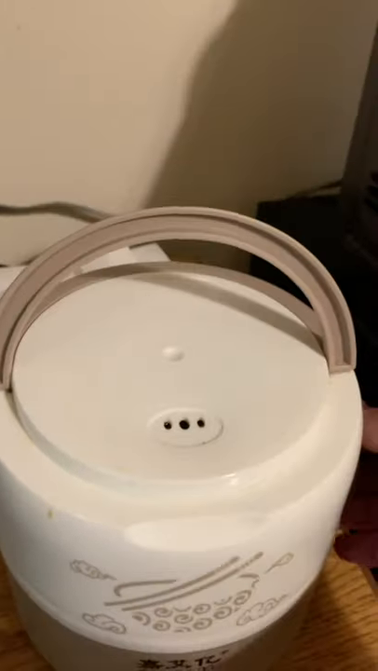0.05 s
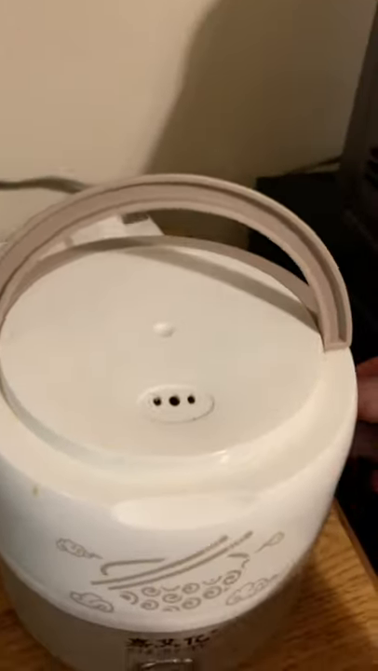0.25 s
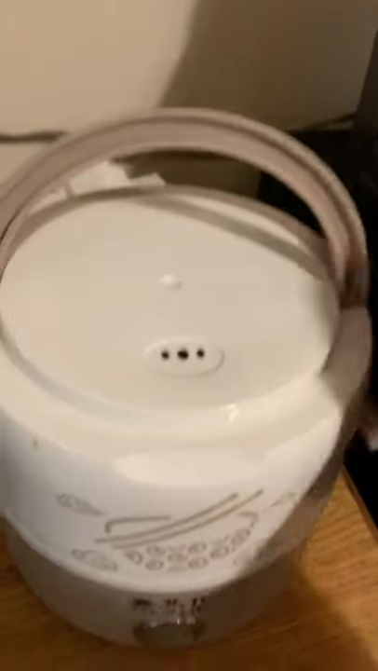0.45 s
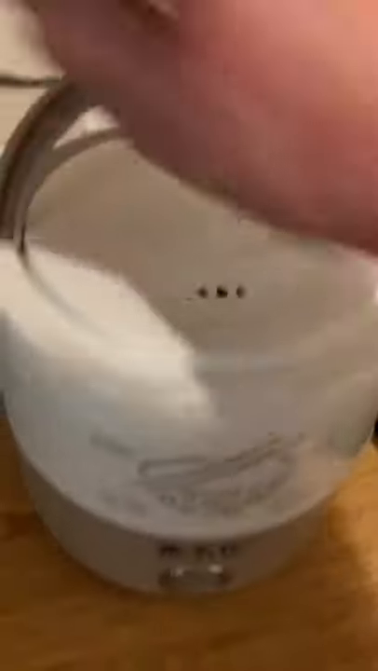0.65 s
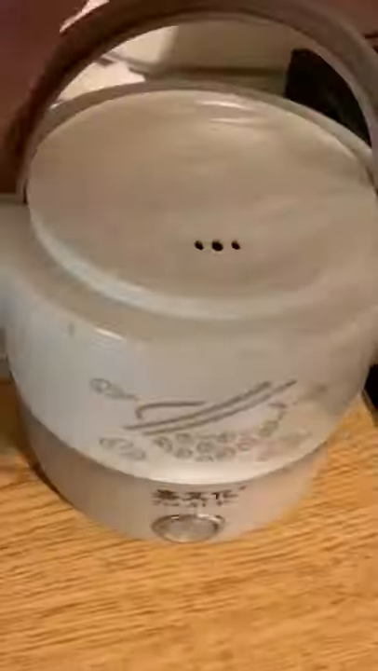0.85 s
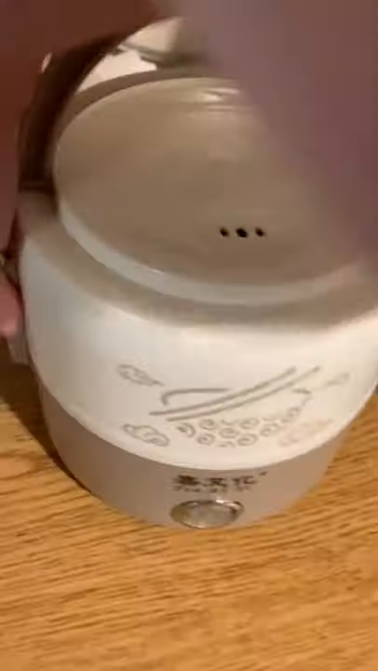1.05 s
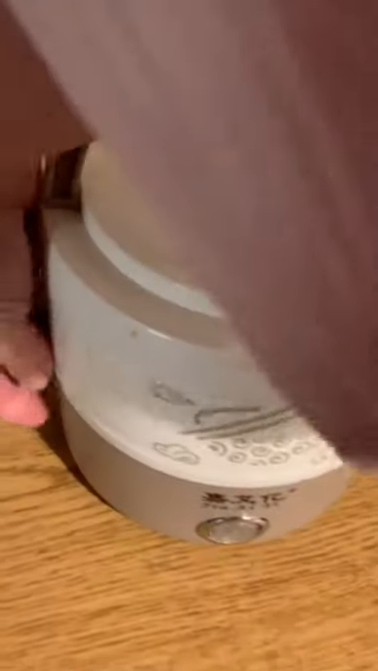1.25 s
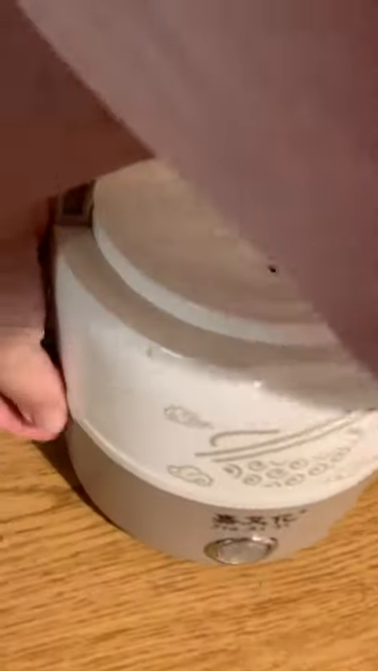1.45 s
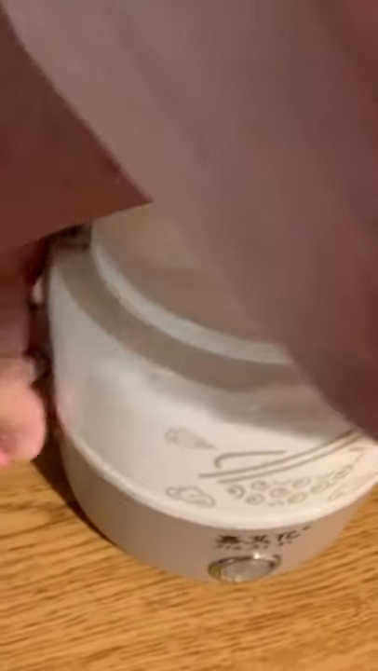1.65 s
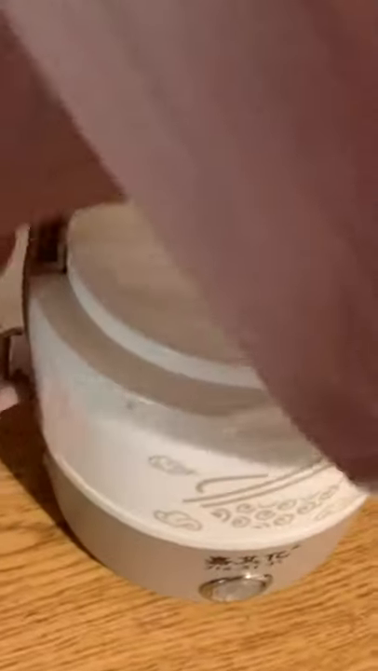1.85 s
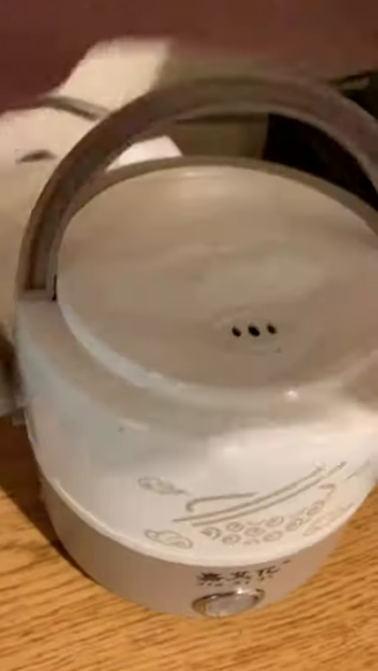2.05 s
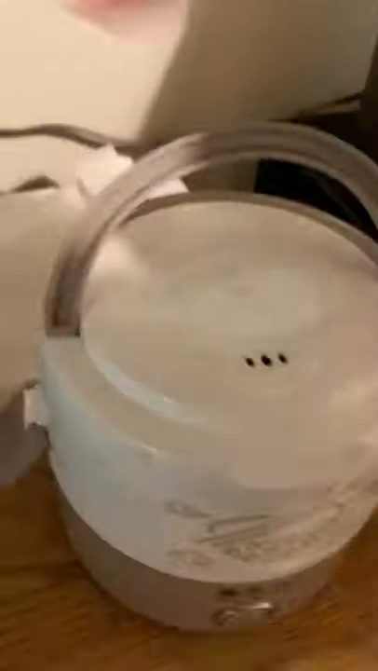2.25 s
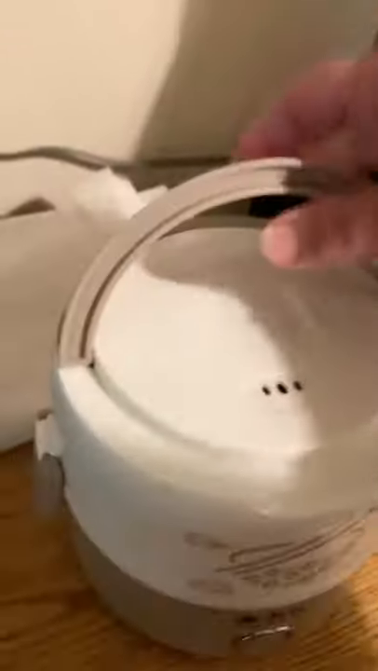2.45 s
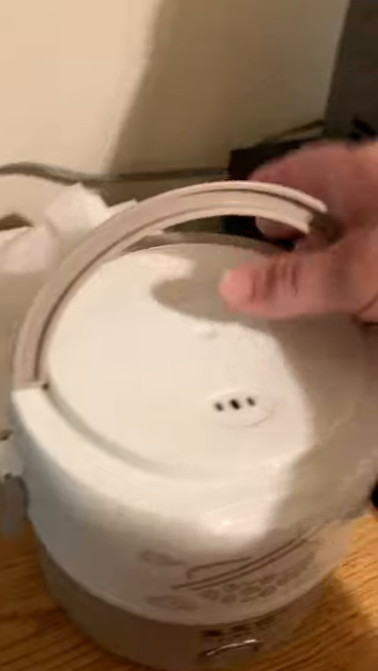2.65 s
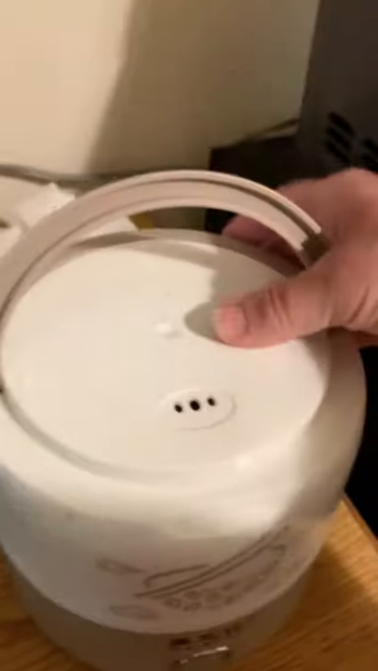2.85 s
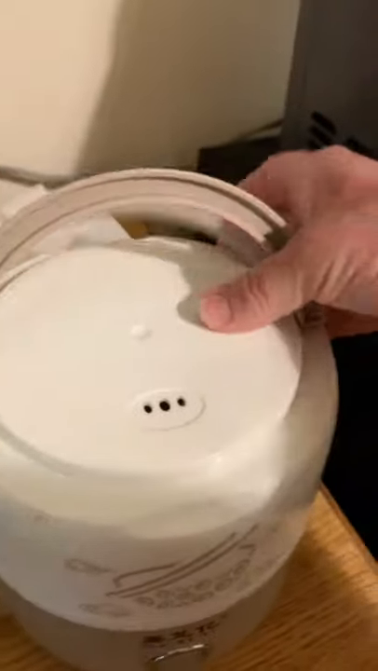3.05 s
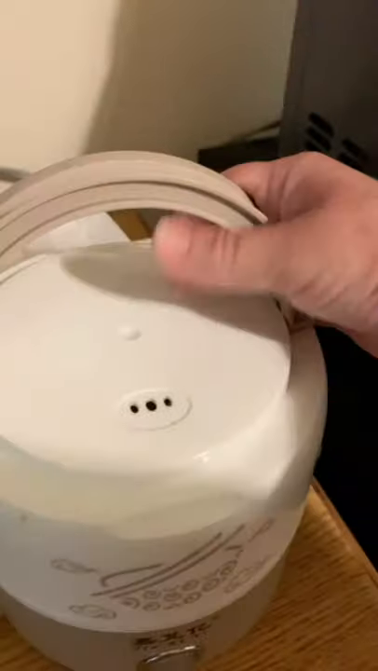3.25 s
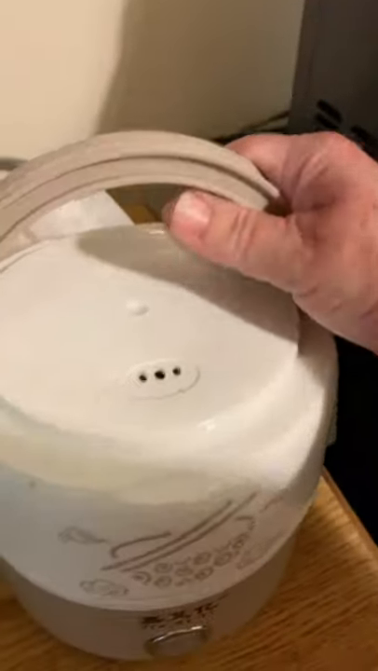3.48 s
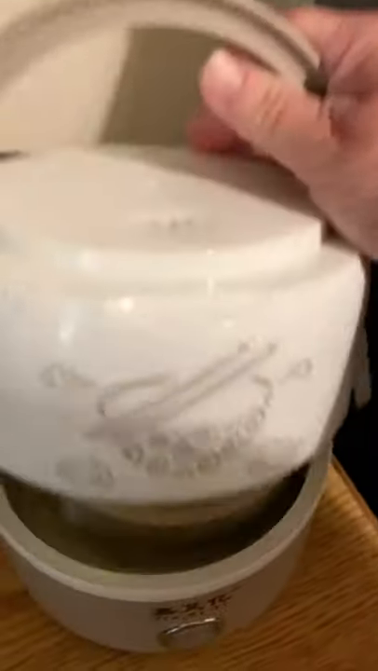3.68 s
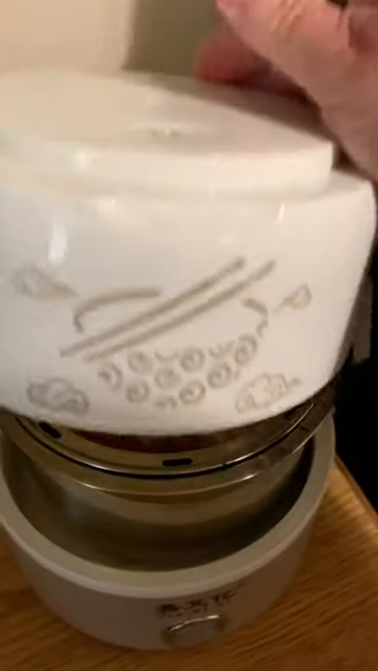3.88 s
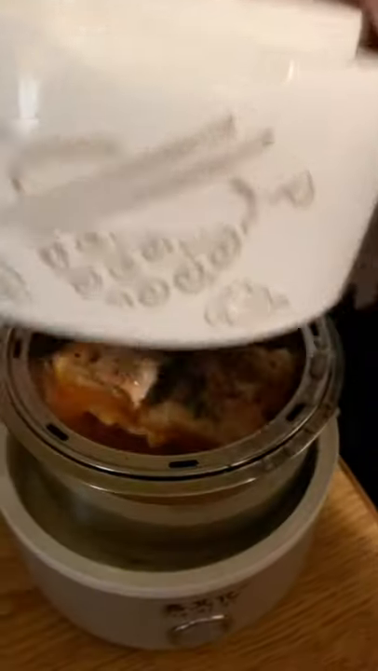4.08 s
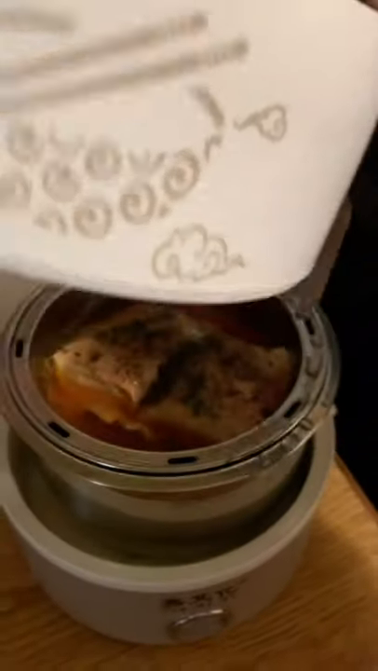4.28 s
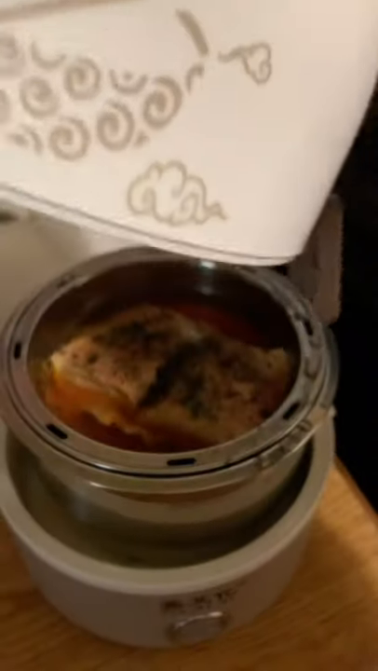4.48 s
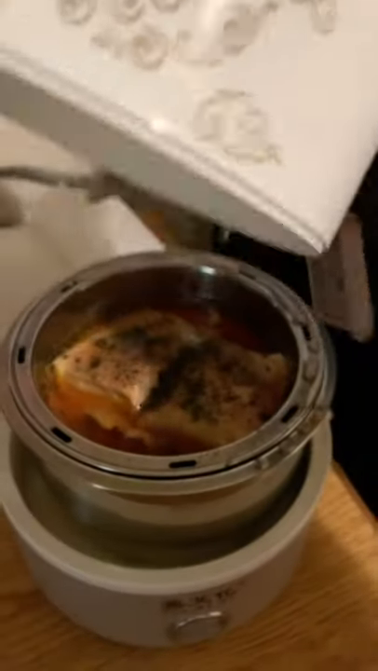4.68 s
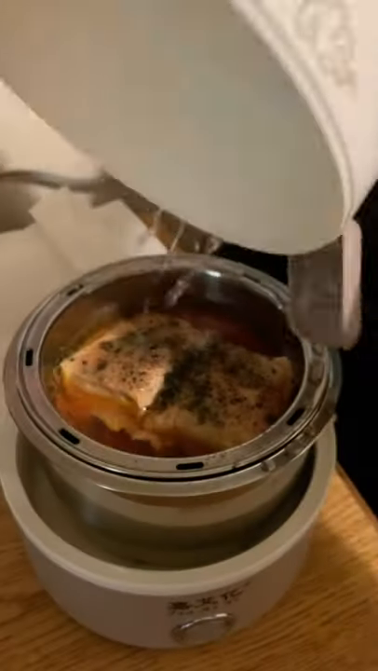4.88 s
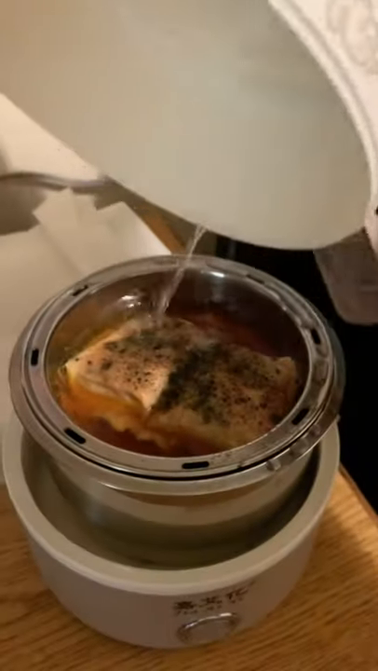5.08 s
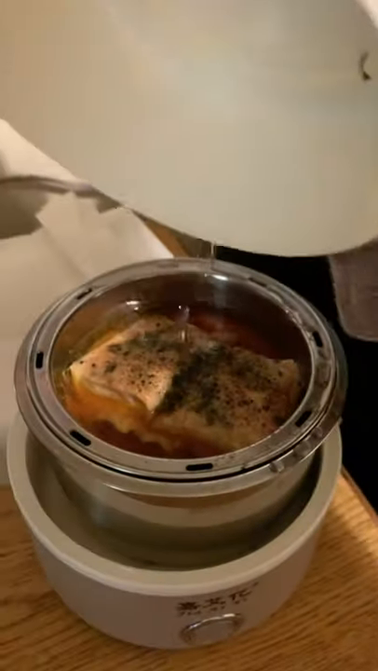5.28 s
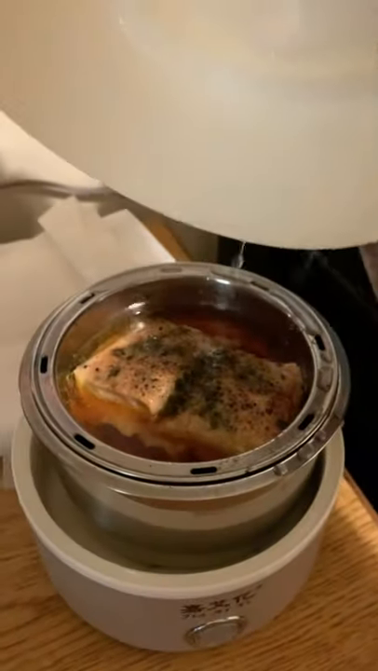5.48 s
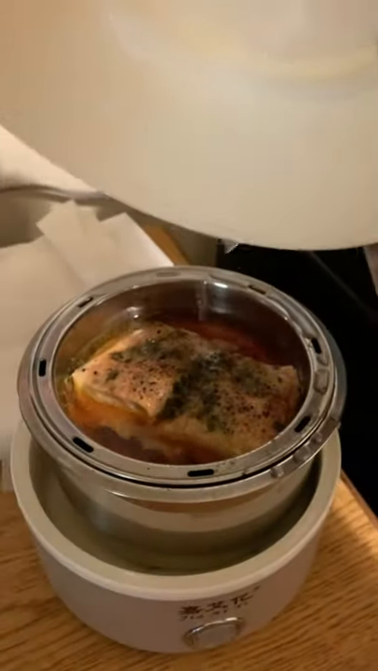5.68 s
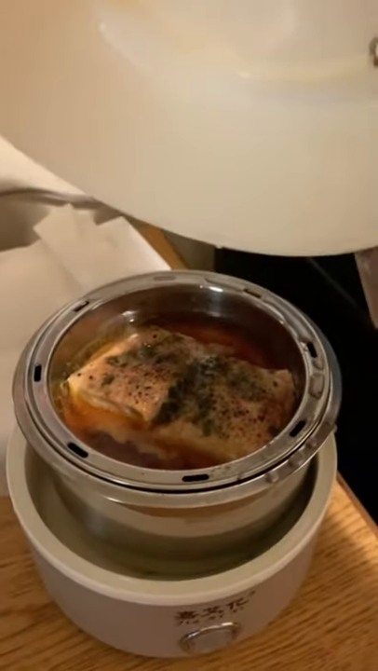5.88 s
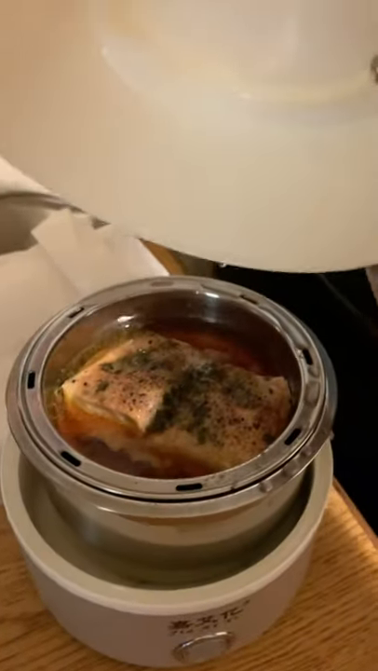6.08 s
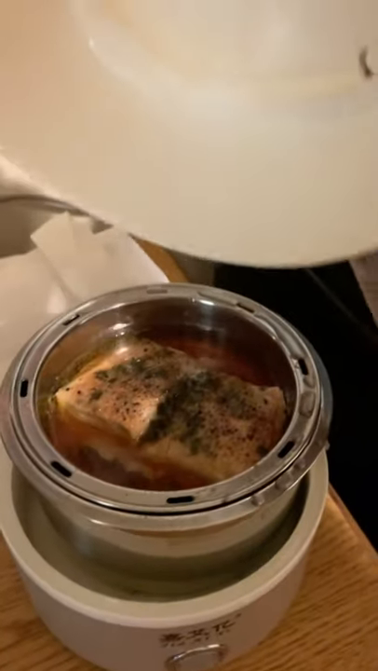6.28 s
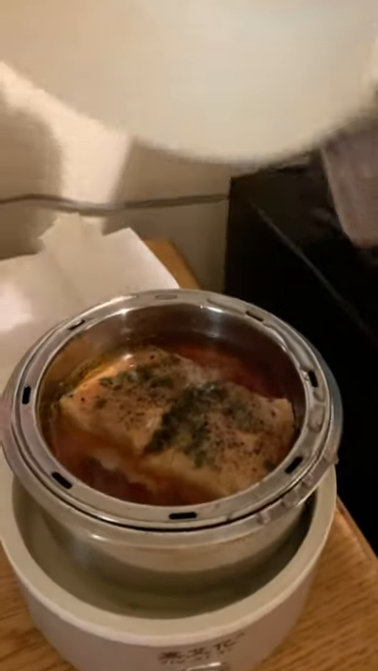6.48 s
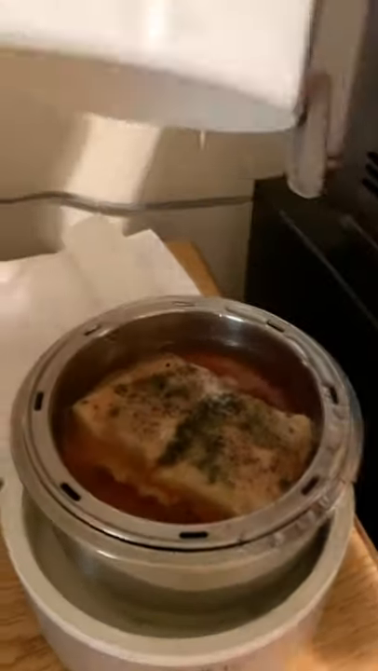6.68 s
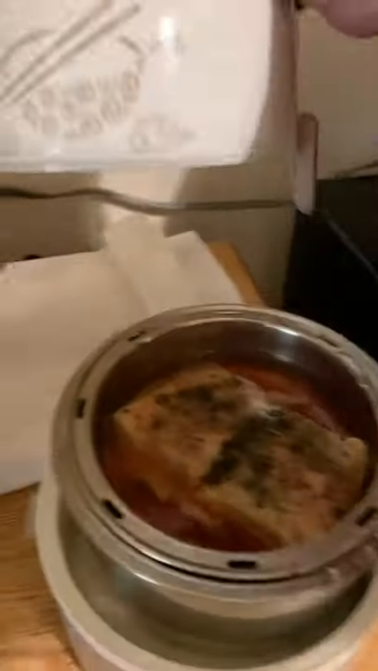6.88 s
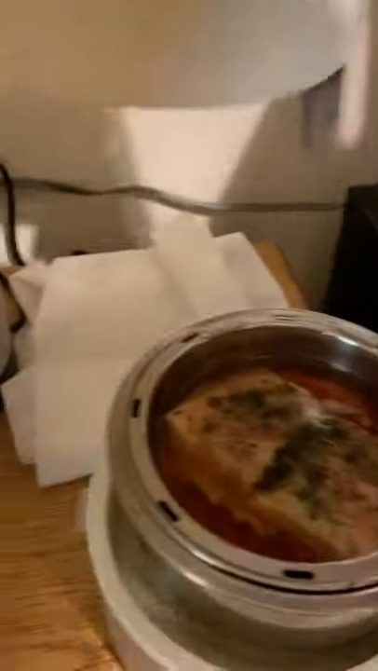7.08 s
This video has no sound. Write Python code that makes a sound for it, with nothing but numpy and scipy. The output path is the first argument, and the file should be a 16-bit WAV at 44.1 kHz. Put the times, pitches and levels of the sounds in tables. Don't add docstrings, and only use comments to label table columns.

```python
import sys
import numpy as np
from scipy import signal
from scipy.fft import rfft, irfft, next_fast_len
from scipy.io import wavfile
from scipy.ndimage import uniform_filter1d

SR = 44100
rng = np.random.default_rng(int(sys.argv[2]) if len(sys.argv) > 2 else 0)


def wrap_up_sound(samples):
    columns = np.atleast_2d(samples).T
    tamed = np.clip(columns, -1, 1)
    steps = np.round(tamed * 32767).astype(np.int16)
    wavfile.write(sys.argv[1], SR, steps)


def convert_level_to_amplitude(level_db):
    exponent = np.asarray(level_db, float) / 20
    return 10 ** exponent


N = 314433


def evened(x):
    return x / np.sqrt(np.mean(x ** 2) + 1e-20)


def peaked(x):
    return x / (abs(x).max() + 1e-20)


def read(points, hz):
    f, value = np.transpose(points)
    return np.interp(np.log(hz + 1), np.log(f + 1), value)


def humps(table):
    return lambda hz: sum(convert_level_to_amplitude(db) / (1 + ((hz - f) / w * 2) ** 2) for f, w, db in table)


def level(rows):
    s, db = np.transpose(rows)
    return convert_level_to_amplitude(np.interp(np.arange(N) / SR, s, db, left=-120, right=-120))


def strokes(rows, rise_db_per_s, fall_db_per_s, rest_db):
    t = np.arange(N) / SR
    s, hold, db = np.transpose(rows)[:, :, None]
    db = db - rise_db_per_s * np.maximum(s - t, 0)
    db = db - fall_db_per_s * np.maximum(t - s - hold, 0)
    return convert_level_to_amplitude(np.maximum(db.max(0), rest_db))


def add(mix, s, sound):
    part = mix[max(round(s * SR), 0):][:len(sound)]
    part += sound[:len(part)]


def ring(modes, t, weight_db=0, detune=1):
    hz, db, t60 = np.transpose(modes)[:, :, None]
    fade = convert_level_to_amplitude(db + weight_db - 60 * t / t60)
    return (fade * np.sin(2 * np.pi * hz * detune * t)).sum(0)


# pitch_hz, likeness (1 = same)
PORT_LIKENESS = [(60, 0.98), (400, 0.82), (1000, 0.36), (2400, 0.4), (4000, 1), (5000, 0.82), (9000, 0.78)]


def two_ports(a, b, c, d, hz):
    same = np.clip(read(PORT_LIKENESS, hz), -1, 1)[:, None]
    left = a + 1j * b
    return np.array([left, same * left + np.sqrt(1 - same ** 2) * (c + 1j * d)])


def diffuse(gain, patchy_db, flicker_db):
    frames, hz = N // 256 + 5, np.fft.rfftfreq(512, 1 / SR)
    a, b, c, d, patches = rng.standard_normal((frames, 257, 5)).T
    patches = evened(uniform_filter1d(uniform_filter1d(patches, size=6, axis=0), size=8, axis=1))
    flicker = evened(uniform_filter1d(rng.standard_normal(frames), size=2))
    z = two_ports(a, b, c, d, hz)
    z *= gain(hz)[:, None] * convert_level_to_amplitude(patchy_db * patches + flicker_db * flicker)
    return evened(signal.istft(z, nperseg=512, noverlap=256)[1][:, :N])


# pitch_hz, level_db_per_hz
HOUSE_HUM = [(15, -23), (27, -5.5), (76, -1), (134, -5), (230, -5.5), (450, -15), (1400, -26.5),
             (1950, -100)]
# pitch_hz, width_hz, level_db
SWAY_COLOUR = [(65, 10, 0)]
# start_s, hold_s, level_db
SWAYS = [
    (1.59, 0.0083, -37),
    (2.8, 0.027, -45.5),
    (3.6, 0.29, -54.5),
    (4.32, 0.25, -49.5),
]


def hum():
    frames, hz = N // 512 + 5, np.fft.rfftfreq(2048, 1 / SR)
    a, b, c, d, e, g = rng.standard_normal((frames, 1025, 6)).T
    house = two_ports(a, b, c, d, hz) * convert_level_to_amplitude(read(HOUSE_HUM, hz))[:, None]
    sway = (e + 1j * g) * humps(SWAY_COLOUR)(hz)[:, None] ** 2
    house, sway = (evened(signal.istft(z, nperseg=2048, noverlap=1536)[1][..., :N]) for z in (house, sway))
    motion = strokes(SWAYS, rise_db_per_s=181, fall_db_per_s=222, rest_db=-62.5)
    return convert_level_to_amplitude(-49) * house + motion * sway


# pitch_hz, t60_s, level_db
ROOM = [(99, 0.22, 7), (530, 0.52, 1.5), (1200, 0.22, 4.5), (3450, 0.31, 0), (16000, 0.12, 4)]


def room(x):
    length, out = SR // 5, np.zeros((2, N))
    hz, t = signal.stft(np.zeros(length), SR, nperseg=256)[:2]
    t60, lift_db = (read(np.array(ROOM)[:, [0, k]], hz)[:, None] for k in (1, 2))
    fade = convert_level_to_amplitude(lift_db - 60 * t / t60)
    turn = np.arange(N) / SR * 7.3 % 3
    for k in range(3):
        taps = np.zeros((3, length))
        at = np.arange(120, length - 20, 20) + rng.integers(0, 20, (3, (length - 121) // 20))
        np.put_along_axis(taps, at, rng.choice([-1., 1.], at.shape), 1)
        z = signal.stft(taps[0] + .5 * taps[1:], SR, nperseg=256)[2]
        tail = signal.istft(z * fade, SR, nperseg=256)[1]
        tail = tail / np.linalg.norm(tail[0])
        share = np.cos(np.pi / 2 * np.minimum(abs((turn - k + 1.5) % 3 - 1.5), 1))
        out += signal.oaconvolve((x * share)[None], tail, axes=1)[:, :N]
    return out


# pitch_hz, width_hz, level_db
STEAM_JETS = [(1870, 470, 6.5), (4600, 1000, -6), (6160, 2040, 0), (10900, 1200, -24.5)]


def steam():
    start_s, level_db = 3.66, -64
    swell = strokes([(start_s, 0, level_db)], rise_db_per_s=62, fall_db_per_s=2, rest_db=-120)
    return convert_level_to_amplitude(7.5) * swell * diffuse(humps(STEAM_JETS), patchy_db=3.5, flicker_db=-1.5)


# pitch_hz, level_db_per_hz
CLOTH = [(300, -29), (1200, -1.5), (2400, 4.5), (3000, -1.5), (6000, -1.5), (10000, -6), (13300, -6),
         (16100, -34)]
# start_s, hold_s, level_db
BRUSHES = [(.15, 0.0042, -67), (.31, 0.014, -73.5), (.95, 0.054, -63.5), (1.18, 0.11, -64.5),
           (1.52, 0.17, -65), (1.93, 0.0075, -71), (2.08, 0.031, -71), (2.17, 0.12, -64.5),
           (2.51, 0.0039, -69), (2.66, 0.055, -63), (2.86, 0.0065, -66), (3.05, 0.015, -70),
           (3.15, .03, -76), (3.46, 2.53, -72)]


def sleeve():
    gain = strokes(BRUSHES, rise_db_per_s=229, fall_db_per_s=183, rest_db=-77.5)
    return convert_level_to_amplitude(8.5) * gain * diffuse(lambda hz: convert_level_to_amplitude(read(CLOTH, hz)), patchy_db=-4.0, flicker_db=1.5)


# pitch_hz, level_db, t60_s
BOX_SHELL = [(790, -12, 0.025), (1150, -8.5, 0.04), (1332, -7.5, 0.016), (1700, -1.5, 0.016),
             (2050, -0.5, 0.0092), (2570, 0, 0.027), (2940, -9, 0.0075), (3130, -10, 0.0098),
             (4820, -0.5, 0.0057)]
# pitch_hz, level_db, t60_s
COVER_SHELL = [(824, 6.5, 0.1), (1120, 8.5, 0.013), (1460, -2, 0.033), (1680, 6, 0.017), (1960, 9.5, 0.012),
               (2515, 5.5, 0.011), (3180, 0, 0.014), (4060, 12, 0.0026)]
# time_s, level_db
HAND_PRESSURE = [
    (0.0, -73.5),
    (2.34, -65.5),
    (3.14, -79.5),
    (3.55, -59),
    (4.35, -67),
    (4.59, -55.5),
    (5.18, -74),
    (7.13, -61),
]


def rubbing():
    grains_per_s = 2500
    uneven = convert_level_to_amplitude(0.9 * np.minimum(rng.exponential(1, N), 4))
    slips = rng.standard_normal((2, N)) * uneven * (rng.random(N) < grains_per_s / SR)
    slips[1] = 0.38 * slips[0] + 0.14 * slips[1]
    shell = ring(BOX_SHELL + COVER_SHELL, np.arange(1500) / SR * 1.05) * convert_level_to_amplitude(-np.arange(1500) / 12.0)
    return convert_level_to_amplitude(4.5) * level(HAND_PRESSURE) * evened(signal.oaconvolve(slips, shell[None], axes=1)[:, :N])


# pitch_hz, width_hz, level_db
GLOSS = [(12000, 3500, 0)]
# start_s, hold_s, level_db
SQUEAKS = [
    (3.056, .012, -55),
    (3.135, .01, -65),
    (3.18, .006, -59),
    (4.66, 0.017, -55),
    (6.99, .02, -74),
]


def squeaks():
    gain = strokes(SQUEAKS, rise_db_per_s=1500, fall_db_per_s=800, rest_db=-120)
    return gain * diffuse(lambda hz: humps(GLOSS)(hz) ** 2, patchy_db=3.5, flicker_db=4.5)


# pitch_hz, width_hz, level_db
POT_RIM = [(350, 380, 6.5), (1200, 480, -14), (2000, 290, -8), (2630, 1300, 1.5), (4090, 230, 4),
           (4490, 240, 5), (6300, 3200, -12.5), (11600, 3600, -19)]
# time_s, level_db
SCRAPE = [
    (3.53, -69),
    (3.59, -61.5),
    (3.69, -61.5),
    (3.72, -57.5),
    (3.76, -57),
    (3.81, -59.5),
    (3.85, -82),
    (3.93, -85),
]


def scrape():
    return convert_level_to_amplitude(15.0) * level(SCRAPE) * diffuse(humps(POT_RIM), patchy_db=-0.5, flicker_db=2.5)


# start_s, level_db, pitch_hz, t60_s
DESK_BUMPS = [(0.311, -27, 157, 0.02), (0.422, -30, 198, 0.056), (0.97, -38.5, 173, 0.041),
              (1.37, -31, 176, 0.022), (1.566, -19.5, 163, 0.058), (1.655, -30.5, 132.5, 0.08),
              (1.701, -30, 290, 0.014), (2.189, -25.5, 326, 0.032), (1.577, -23.5, 108, 0.091),
              (2.189, -31, 138, 0.077), (3.081, -25, 176, 0.027), (3.089, -27.5, 190, 0.027),
              (3.254, -39, 131, 0.1), (3.326, -34, 204, 0.025), (3.387, -37.5, 181.7, 0.73),
              (3.44, -30.5, 178, 0.029)]
# start_s, level_db, pitch_hz, t60_s
HANDLE_TAPS = [
    (0.562, -29, 469, 0.081),
    (0.672, -35, 453, 0.053),
    (3.572, -27.5, 441, 0.049),
]


def bumps():
    out, t = np.zeros(N), np.arange(8000) / SR
    for s, db, hz, t60 in DESK_BUMPS + HANDLE_TAPS:
        thud = ring([(hz, 0, t60), (hz * 1.6, -8, t60 * .6)], t) * (1 - np.exp(-t / .003))
        add(out, s, convert_level_to_amplitude(db + 3.0) * peaked(thud))
    return out


# pitch_hz, level_db
CRACK = [(600, 5), (1500, 7), (2600, 11), (4000, 4), (8000, 2.5), (11500, -5), (15500, -7), (16400, -26)]
# pitch_hz, width_hz, level_db
STIFF_RIBS = [(3850, 170, -5.5), (7320, 960, -7), (11360, 880, -0.5)]


def knocks(rows, low, shell, spot_db, scatter_db, crack_t60):
    out, t = np.zeros(N), np.arange(4600) / SR
    short, hz = t[:1024], np.fft.rfftfreq(1024, 1 / SR)
    held = convert_level_to_amplitude(-60 * short / .05)
    thin = signal.butter(2, 864, "high", fs=SR)
    chance, noise = rng.standard_normal((len(rows), 24, 1)), rng.standard_normal((len(rows), 2048))
    for (s, db, low_db, crack_db, spot_hz, contact_ms), luck, hiss in zip(rows, chance, noise):
        u = short / (contact_ms / 1000)
        contact = u ** 1.41 * np.exp(-u) * hiss[:1024] * abs(hiss[:1024]) ** 1.41
        even = rfft(contact)
        even = irfft(even / np.sqrt(uniform_filter1d(abs(even) ** 2, size=9)))
        even = even * np.minimum(u * 4, 1)

        near = np.exp(-(np.log(np.array(shell)[:, :1] / spot_hz) / 0.17) ** 2)
        weight_db = spot_db * near + scatter_db * luck[:len(shell)]
        modes = held * ring(shell, short, weight_db, 1 + 0.018 * luck[12:12 + len(shell)])
        body = ring(low, t, 2.0 * luck[21:21 + len(low)])
        body = body * (1 - np.exp(-t / 0.0042))

        crack = peaked(abs(contact)) ** 0.97 + 0.73 * np.minimum(u, 1) * convert_level_to_amplitude(-60 * short / crack_t60)
        octaves = np.log2(np.maximum(hz / 7000, 1))
        bright_db = 0.66 * (db + crack_db + 21.5) * octaves
        ribs = 1 + sum(convert_level_to_amplitude(rib_db + 5.1 * k) / (1 + 2j * (hz - f) / w)
                       for (f, w, rib_db), k in zip(STIFF_RIBS, luck[17:, 0]))
        crack = irfft(rfft(crack * hiss[1024:]) * convert_level_to_amplitude(read(CRACK, hz) + bright_db) * ribs)

        sound = convert_level_to_amplitude(low_db + 2.0) * peaked(body)
        sound[:2047] += peaked(signal.lfilter(*thin, signal.fftconvolve(modes, even)))
        sound[:1024] += convert_level_to_amplitude(crack_db + 11.0) * peaked(crack)
        add(out, s - .0006 * contact_ms, convert_level_to_amplitude(db - 0.5) * sound)
    return out


def ticks(rows):
    hollow_db, contact_ms = -16.5, 1.1
    return [(s, db, hollow_db, crack_db, hz, contact_ms) for s, db, crack_db, hz in rows]


# start_s, shell_db, hollow_rel_db, crack_rel_db
ON_RIM = [(4.371, -35.5, -16, -28), (4.426, -41, -30, -22), (4.44, -26, -36, -10.5), (4.7, -34, -15, -17),
          (4.749, -23.5, -13, -10.5), (4.819, -37, -15, -8), (4.83, -29.5, -26, -27),
          (4.966, -25.5, -34, -19), (5.025, -33, -7, -31), (5.053, -32.5, -30, -34), (5.184, -36, -30, -12),
          (5.232, -21, -15, -12), (5.24, -33, -24, -17), (5.526, -30, -6.5, -28), (5.566, -22, -9.5, -5),
          (5.711, -35, -7, -38), (5.828, -42, -5, -29), (5.904, -28.5, -9, -28), (6.002, -37, -9, -31),
          (6.025, -24, -15, -17), (6.569, -37, -36, -24), (6.582, -34, -8.5, -13.5), (6.903, -31, -39, -19),
          (6.949, -35, -20, -24), (6.992, -38, -28, -1.5), (7.079, -32.5, -10.5, -30),
          (7.095, -27, -22, -22)]
# start_s, shell_db, hollow_rel_db, crack_rel_db
ON_WALL = [(4.465, -32, -31, -29), (4.65, -33.5, -21, -14), (4.738, -22, -29, -24),
           (4.883, -22, -11.5, -15), (5.074, -32, -14.5, -12.5), (5.19, -26.5, -8, -16.5),
           (5.358, -25, -11, -10.5), (5.365, -26.5, -17, -19), (5.393, -33, -27, -4.5),
           (5.412, -32, -27, -16), (5.534, -28.5, -33, -13.5), (5.556, -34, -15, -15),
           (5.649, -25.5, -30, -15), (5.657, -18.5, -13.5, -22), (5.75, -32, -27, -19),
           (6.083, -24.5, -12.5, -17), (6.741, -37, -13.5, -35)]
# start_s, shell_db, hollow_rel_db, crack_rel_db
ON_HINGE = [(4.351, -31, -31, -19), (4.494, -21.5, -28, -37), (4.53, -15.5, -29, -19),
            (4.544, -21.5, -42, -14), (4.583, -30.5, -24, -22), (4.6075, -19.5, -30, -14),
            (4.709, -22.5, -25, -21), (5.221, -23.5, -31, -20), (5.402, -18, -17.5, -8.5),
            (5.736, -33.5, -6.5, -13), (6.045, -21.5, -9.5, -7), (6.127, -21, -16, -17.5),
            (6.146, -25.5, -6.5, -38), (6.156, -17.5, -42, -10.5), (6.813, -34.5, -22, -38),
            (7.055, -37, -24, -28)]
# start_s, shell_db, crack_rel_db, spot_hz
COVER_TICKS = [(4.431, -36, -20, 1460), (4.447, -34, -26, 1120), (4.488, -30.5, -15, 2430),
               (4.503, -32, -20, 1120), (4.565, -34, -22, 1960), (4.64, -35, -25, 2430),
               (4.756, -29, -10, 1960), (4.764, -34, -24, 2430), (4.842, -35, -25, 1120),
               (4.878, -28.5, -17, 1650), (4.888, -28, -10.5, 1120), (4.902, -40, -11, 1120),
               (5.037, -32, -25, 1120), (5.062, -40, -20, 1960), (5.088, -50, -25, 1960),
               (5.197, -29.5, -8.5, 1960), (5.328, -48, -26, 1650), (5.541, -28, -24, 1650),
               (5.572, -32, -21, 2430), (5.63, -35, -12, 1650), (5.731, -35, -15, 1960),
               (5.793, -40.5, -22, 1120), (5.877, -45, -25, 1960), (5.913, -36, -30, 1460),
               (5.96, -44, -30, 1120), (6.034, -31, -27, 1120), (6.053, -25, -10.5, 1960),
               (6.116, -38, -22, 1960), (6.165, -44, -14, 1460), (6.188, -46, -22, 1460)]


def rattle_rows():
    spots = [(ON_RIM, 1175, 1.823), (ON_WALL, 1540, 1.6), (ON_HINGE, 2270, 1.4)]  # spot_hz, contact_ms
    return sorted((*row, hz, ms) for rows, hz, ms in spots for row in rows) + ticks(COVER_TICKS)


def chatter():
    contacts_per_s, level_db, t60_s = 450, -14, 0.11
    s, db = np.transpose(rattle_rows())[:2]
    shaken = np.zeros(N)
    np.add.at(shaken, (s * SR).astype(int), convert_level_to_amplitude(db))
    shaken = signal.lfilter([1], [1, -convert_level_to_amplitude(-60 / t60_s / SR)], shaken)
    contacts = rng.standard_normal(N) * (rng.random(N) < contacts_per_s / SR)
    t = np.arange(600) / SR
    cover = peaked(ring(COVER_SHELL, t) * convert_level_to_amplitude(-60 * t / .02))
    return convert_level_to_amplitude(level_db) * signal.oaconvolve(shaken * contacts, cover)[:N]


# pitch_hz, level_db, t60_s
COVER_BODY = [(343, 8, 0.1), (750, -3, 0.045)]


def rattles():
    return knocks(rattle_rows(), COVER_BODY, COVER_SHELL, spot_db=9.5, scatter_db=2.5, crack_t60=0.015)


# pitch_hz, level_db, t60_s
BOX_BODY = [(185, 0.5, 0.06), (316, 7, 0.06), (472, 4.5, 0.055)]
# start_s, shell_db, hollow_rel_db, crack_rel_db
LID_KNOCKS = [(0.049, -43.5, 8, -17), (0.073, -22.5, -5, -15), (0.164, -43.5, 2, -34),
              (0.418, -15.5, -5, -14), (0.424, -31, -11, -26), (0.56, -21, -13, -20),
              (0.67, -30.5, -9, -22), (0.741, -36.5, -2.5, -31), (0.78, -46.5, 3, -36),
              (1.298, -45, -12, -31), (1.682, -32, -1, -12), (1.711, -37.5, -15, -14),
              (1.766, -37.5, -4.5, -16.5), (1.825, -38.5, -3, -18), (2.41, -28, -5, -19.5),
              (2.904, -46, 3.5, -27), (3.029, -31, -4, -48), (3.08, -33.5, 6.5, -47),
              (3.189, -27, -7.5, -5), (3.291, -35, -4, -13.5), (3.448, -38, 5.5, -25),
              (3.492, -25, -3.5, -14.5), (3.569, -20, -10, -12), (3.583, -26, 1, -33),
              (3.713, -34, -5, -10)]
# start_s, shell_db, crack_rel_db, spot_hz, contact_ms
LATCHES = [(1.5635, -8.5, -17.5, 1026, 1.285), (1.5704, -7.5, -12.5, 1990, 1.576),
           (1.581, -23, -29, 1340, 2.9), (1.672, -30, -31, 2000, 1.9), (1.93, -38.5, -18, 1400, 3.1),
           (1.96, -42, -26, 1610, 3.2), (2.0, -18, -0.5, 1720, 0.88), (2.186, -8, -9, 1170, 1.33),
           (2.2, -19.5, -13, 1700, 1.56), (2.328, -15.5, -9, 1220, 1.37), (2.339, -26, -23, 1660, 1.75),
           (3.355, -29.5, -14, 2670, 1.67), (3.48, -17, -25, 2020, 2.66), (3.661, -32.5, -21, 2630, 2.2),
           (3.735, -25.5, -18, 2030, 1.8), (3.898, -26, -12, 2700, 3.4)]
# start_s, shell_db, crack_rel_db, spot_hz
BOX_TICKS = [(3.055, -41, -25, 1890), (3.073, -39, -33, 1400), (3.087, -43, -30, 1700),
             (3.093, -45, -34, 1200), (3.189, -25, -13, 2580), (3.379, -56, 5.5, 2600),
             (3.393, -56, 5, 2600), (1.567, -11, -13, 1150), (3.575, -21.5, -25, 2000),
             (3.595, -26.5, -28, 2000), (3.607, -38, -22, 2570), (3.696, -42, -6, 3200)]


def snaps():
    lid_hz, lid_ms = 1145, 2.335
    hollow_db, stiff_hz, hollow_db_per_octave = -7, 1400, -17
    rows = [(*row, lid_hz, lid_ms) for row in LID_KNOCKS]
    for s, db, crack_db, hz, ms in LATCHES:
        octaves = max(np.log2(hz / stiff_hz), 0)
        rows.append((s, db, hollow_db + hollow_db_per_octave * octaves, crack_db, hz, ms))
    rows = sorted(rows) + ticks(BOX_TICKS)
    return knocks(rows, BOX_BODY, BOX_SHELL, spot_db=14.5, scatter_db=1.0, crack_t60=0.015)


def scene():
    hits = snaps() + rattles() + bumps()
    steady = hum() + steam() + sleeve() + rubbing()
    return hits + convert_level_to_amplitude(-14.5) * room(hits) + steady + squeaks() + scrape() + chatter()


# pitch_hz, left_lead_rad
PORT_LEAD = [(0, 0), (300, -.3), (800, -.9), (1100, 0), (1500, .1), (2100, 1.2), (2600, 2.1), (3200, 2.2),
             (4000, 1.5), (4800, 3.14), (7000, 6.28), (9700, 9.42), (15000, 15.7), (22050, 24)]
# pitch_hz, left_minus_right_db
PORT_LEAN = [(60, -1.5), (400, -1.5), (800, -3), (1100, -4.5), (2100, -5.5), (2700, -0.5), (4600, -7),
             (6000, 0)]


def low_pass(x):
    return signal.sosfilt(signal.butter(12, 16800, fs=SR, output="sos"), x)


def record(dry):
    size = next_fast_len(N + 4096)
    f = np.fft.rfftfreq(size, 1 / SR)
    low_cut = 1 / (1 + (32 / (f + 1)) ** 6)
    half = convert_level_to_amplitude(read(PORT_LEAN, f) / 2) * np.exp(.5j * np.interp(f, *np.transpose(PORT_LEAD)))
    mix = irfft(rfft(dry, size) * low_cut * np.array([half, 1 / half]), size)[:, :N]
    return low_pass(mix)


dry = scene()
out = record(dry)
wrap_up_sound(out)
```